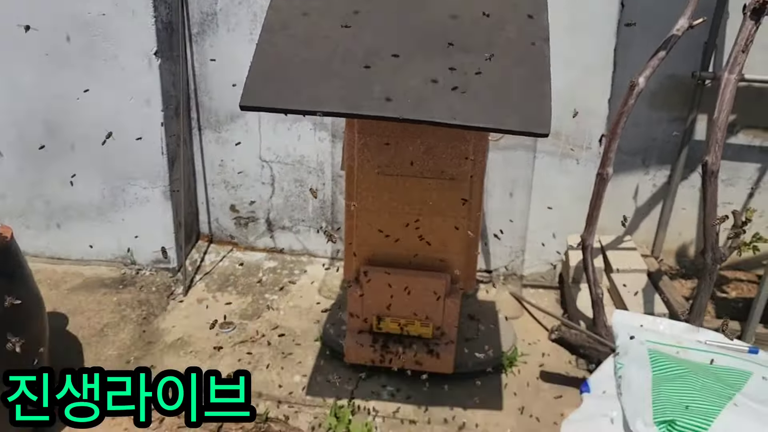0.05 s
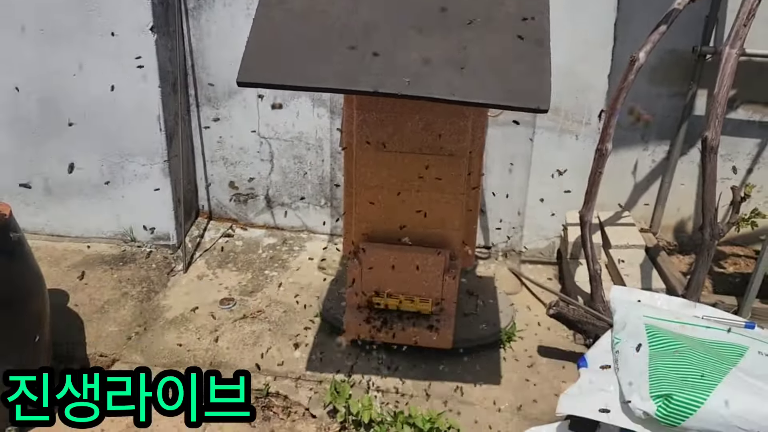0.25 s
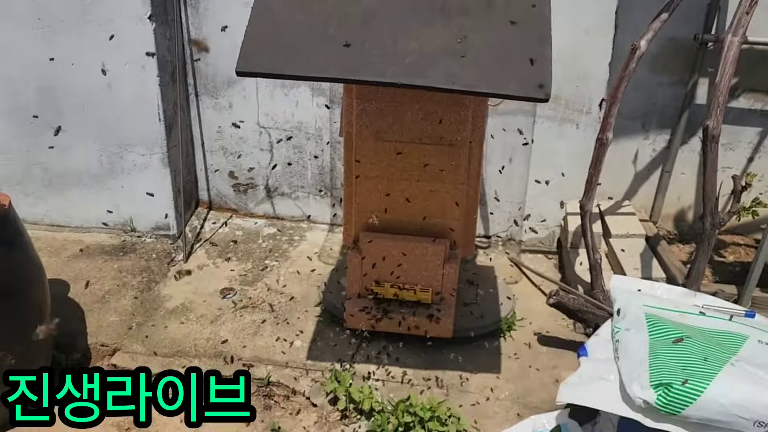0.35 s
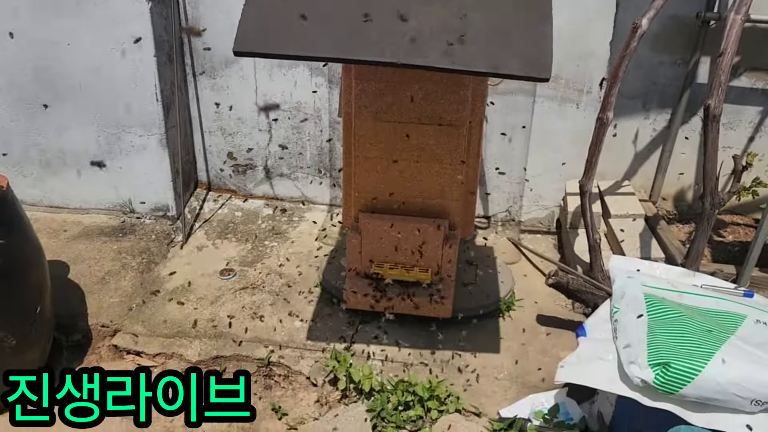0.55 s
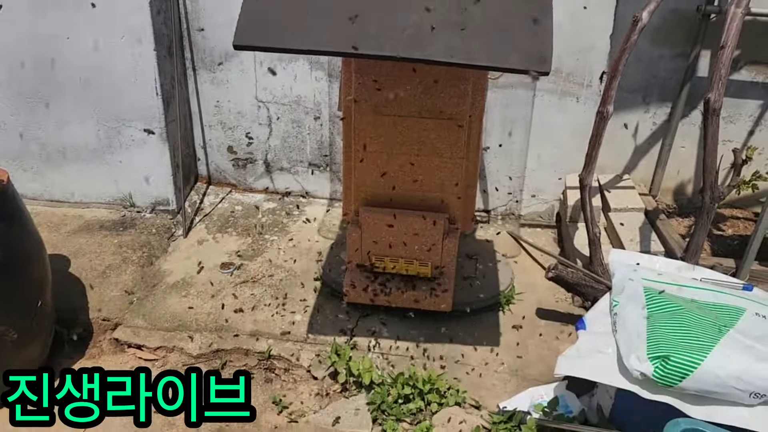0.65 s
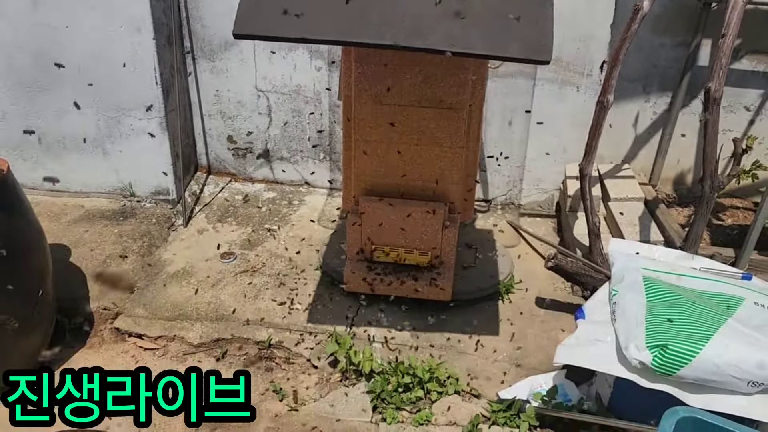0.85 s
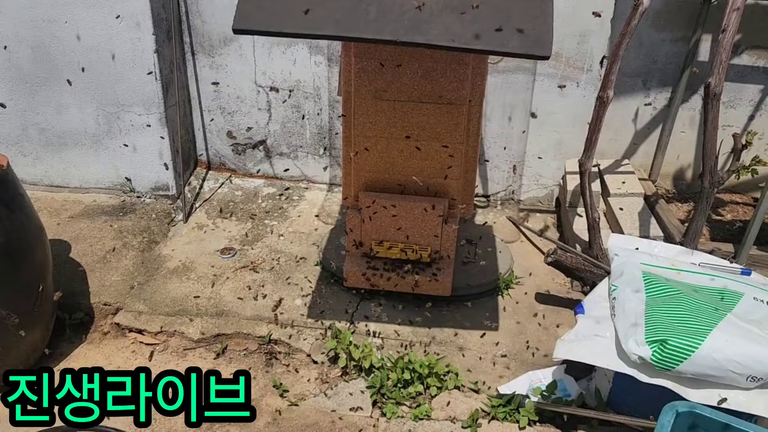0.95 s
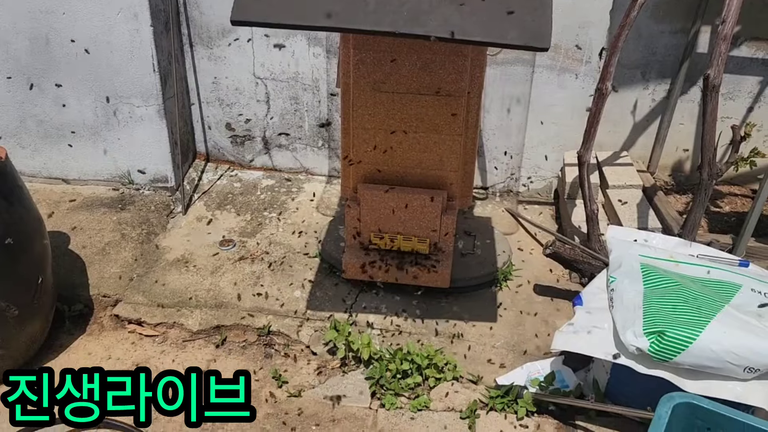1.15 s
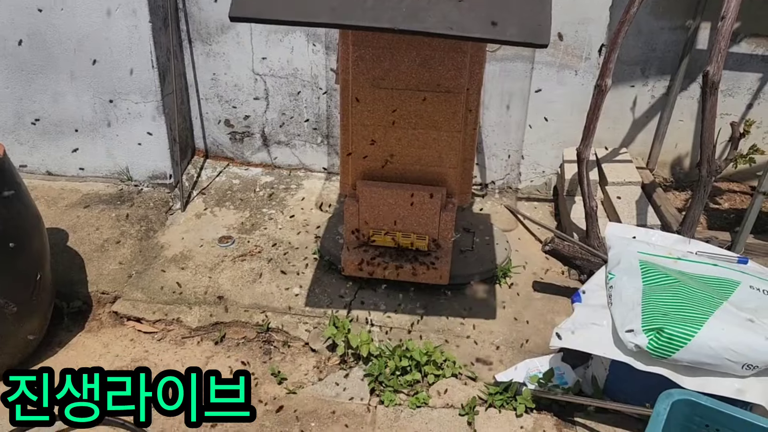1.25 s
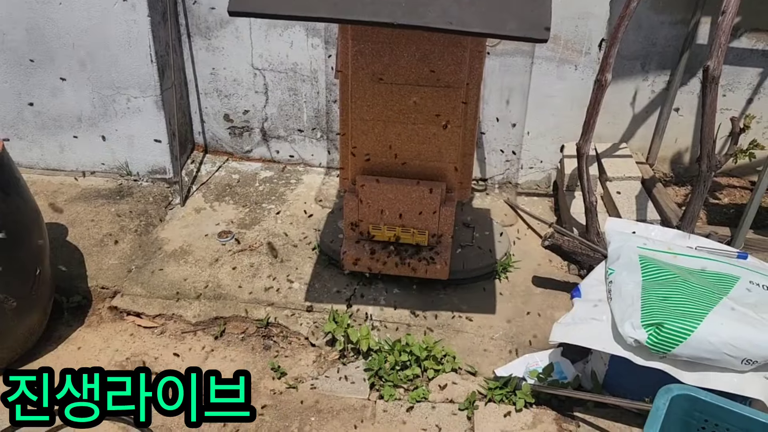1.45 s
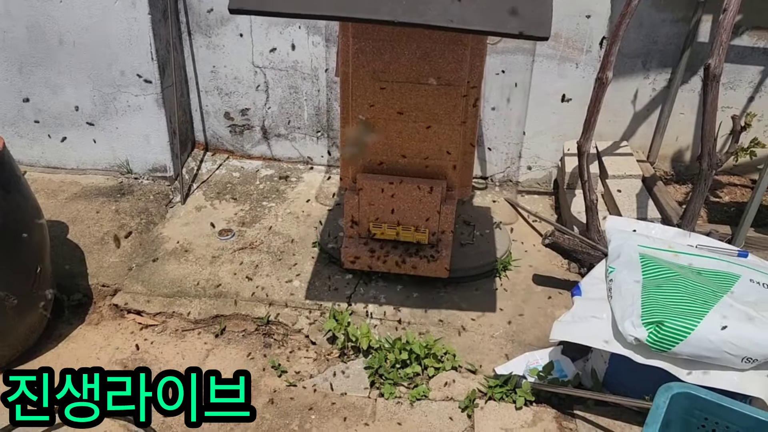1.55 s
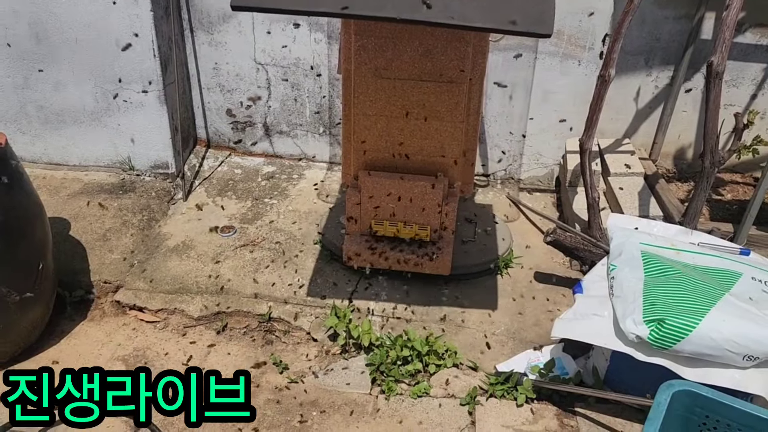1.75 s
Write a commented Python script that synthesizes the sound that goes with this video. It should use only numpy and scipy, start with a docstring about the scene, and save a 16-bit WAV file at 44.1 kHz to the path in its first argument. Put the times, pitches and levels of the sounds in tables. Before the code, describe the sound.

A swarm of honeybees buzzes steadily around a wooden hive in a small walled yard, single bees darting close. Near the start, one sharp knock snaps by the microphone with a soft thump, then a light breeze rumbles over steady hiss.

```python
"""A small walled yard, where honeybees circle a wooden hive. Each bee buzzes on its own wandering
wingbeat, the walls add a short echo, and a few bees dart close, swelling and bending in pitch.
One sharp knock snaps and rings right by the microphone, followed by a soft low thump.
A light breeze rumbles and bumps on the microphone over a bed of steady hiss."""
import sys
import numpy as np
from scipy import signal
from scipy.fft import rfft, irfft
from scipy.io import wavfile
from scipy.ndimage import map_coordinates

SR = 44100
rng = np.random.default_rng(int(sys.argv[2]) if len(sys.argv) > 2 else 0)


def put_to_file(sound):
    """Save the sound as 16-bit audio at rate SR, in the file named by the first command-line argument."""
    columns = np.atleast_2d(sound).T  # one column per channel
    safe = np.clip(columns, -1, 1)
    whole_steps = np.round(safe * 32767)
    wavfile.write(sys.argv[1], SR, whole_steps.astype(np.int16))


N = 79380

# Pitch spread of the swarm. Each row: share of bees that beat slower (0-1), wingbeat in Hz.
WINGBEAT_SPREAD = [(0, 197.7), (.12, 221), (.35, 246.1), (.65, 264), (.9, 279.2), (1, 293.5)]
# Tone colour of one bee. Each row: frequency in Hz, relative harmonic level in dB.
BUZZ_TONE = [(200, 1.5), (270, -3), (420, 0), (530, 0.5), (760, -8), (1050, -9), (1400, -5), (1750, -11),
             (2200, -14), (3000, -18), (5000, -25.5), (8000, -26.5)]
# Close fly-bys. Each row: closest moment in seconds, wingbeat in Hz, glide at that moment in Hz per
# second, level in dB, boost or cut of the fundamental in dB.
FLY_BYS = [(.31, 260.3, -20, -43, -7), (.44, 269.6, -40, -52, -5), (0.699, 283, -39.5, -47.5, -1),
           (.77, 238, -110, -47, -12), (0.841, 262.6, -90.5, -48.5, 9), (.98, 243, -69, -46, 0),
           (1.14, 278.5, 39.5, -48.5, -1), (1.40, 269.4, 30.5, -51.5, 11), (1.59, 271.4, -61, -48.5, -12),
           (1.75, 254.7, 61, -61, 13)]
# Ring of the knock. Each row: pitch in Hz, left and right relative levels in dB, t60 in seconds.
RING_MODES = [(1272, -0.5, -14, 0.049), (1457, -11.5, -9, 0.056), (2210, -7, -22, 0.022),
              (2360, 5, -4.5, 0.019), (3540, -17, 1, .02), (3720, -12, -1.5, 0.026), (4170, -11, -1, 0.021),
              (5557, -4.5, -2.5, 0.043), (6200, -1.5, -7, 0.033), (7640, -1.5, -10, 0.071),
              (7840, -13, -2.5, 0.074), (7860, 2, -15, .045), (8224, -22, -3.5, .04),
              (10590, -24, -11, .025), (14100, -11, -19, .035)]
# Bright crack of the knock. Each row: frequency in Hz, relative level in dB.
CRACK_SPECTRUM = [(300, -35), (850, -28), (1250, -10), (2300, 2.5), (2850, -6), (3600, 2.5), (6000, 0),
                  (8000, 5.5), (9300, -8), (12000, -2.5), (15500, -16)]
# Duller tail of the knock. Each row: frequency in Hz, relative level in dB.
TAIL_SPECTRUM = [(300, -25), (850, -14), (1250, -3), (2300, -4.5), (2850, -6), (3700, -2.5), (6000, -3),
                 (7900, -0.5), (9300, -11), (12000, -9), (15500, -16)]
# Low bumps on the microphone. Each row: start in seconds, pitch in Hz, level in dB, rise in seconds.
MIC_BUMPS = [(0.216, 63, -28.5, 0.0067), (1.009, 58.5, -35, 0.0056), (1.272, 88, -29, 0.0056),
             (1.337, 50.5, -40, 0.0093)]
# Swell of the breeze. Each row: time in seconds, level before panning in dB.
GUST_LEVELS = [(0, -53), (.4, -52.5), (.57, -55), (.64, -49), (.7, -54), (.95, -52.5), (1.02, -43),
               (1.07, -48), (1.255, -47.5), (1.32, -41), (1.37, -44), (1.46, -50), (1.535, -40),
               (1.58, -49.5), (1.75, -50.5), (1.8, -50)]
# Wind rumble on the microphone. Each row: frequency in Hz, relative level in dB.
RUMBLE_SPECTRUM = [(15, -29), (30, -5), (55, 2.5), (85, -2.5), (125, -9), (180, -8.5), (400, -44.5)]
# Colour of the hiss bed. Each row: frequency in Hz, relative level in dB.
HISS_SPECTRUM = [(100, -4.5), (350, 7.5), (1000, 1.5), (2000, 2), (2800, -3.5), (4700, -3.5), (6800, -3),
                 (7600, 2), (8250, -1.5), (8900, -12), (11000, -12.5), (12500, -8), (16000, -10)]

BEE_COUNT, SWARM_DB = 90, -41.5
WANDER, WANDER_PER_S = .024, 7  # pitch drift as a bee steers, as a share of its wingbeat
FLUTTER, FLUTTER_PER_S = .004983, 35  # quick unevenness of the wingbeat, also a share
DISTANCE_DB, SWOOP_DB, SWOOP_PER_S = 1.5, 3, 6.04  # near and far bees; coming and going
SIDE_LAG_S, PAN_DB = .00019, 3  # between the channels, for a bee far to one side
YARD_T60_S, YARD_DB = .23, -9.5
PASS_S = .035  # time for a fly-by to fall by 6 dB
KNOCK_S, KNOCK_RISE_S, KNOCK_LAG_S, RING_DB = .2067, .00038, .00005, -15
SNAP_DB, SNAP_T60_S = -5, .007  # first instant of the contact
CRACK_DB, CRACK_T60_S = -15, .024
TAIL_DB, TAIL_T60_S = -22, .1
BREEZE_PAN_DB, BREEZE_SIDE_DB = -3, -10
HISS_DB, TOP_HZ = -47, 16000


def bee(t, wing_hz, bend_hz, fundamental_db=0, size=1024, harmonics=30):
    """One buzz: a wing stroke looped at a fluttering rate, drifting from side to side in flight."""
    slow = np.linspace(0, t[-1], size)
    k = np.arange(harmonics) + 1
    tone = gain_at(k * wing_hz, BUZZ_TONE)
    tone = tone / np.linalg.norm(tone) * undb(fundamental_db * (k == 1))
    partials = tone * np.exp(2j * np.pi * rng.random(harmonics))
    stroke = size / np.sqrt(2) * irfft(np.append(0, partials), size)
    flutter = np.interp(t, slow, FLUTTER * walk(slow, FLUTTER_PER_S))
    phase = np.cumsum(wing_hz * (1 + flutter) + bend_hz) / SR
    side = np.interp(t, slow, np.tanh(walk(slow, 1)))
    channels = []
    for toward in (side / 2, -side / 2):  # the nearer channel is earlier and louder
        place = (phase + toward * SIDE_LAG_S * wing_hz) % 1 * size
        buzz = np.interp(place, np.arange(size + 1), np.append(stroke, stroke[0]))
        channels.append(buzz * undb(toward * PAN_DB))
    return np.array(channels)


def swarm(t):
    """A cloud of bees, each wandering in pitch and distance, with a short echo off the yard walls."""
    shares, hz = np.array(WINGBEAT_SPREAD).T
    slow = np.linspace(0, t[-1], 512)
    direct = 0
    for wing_hz in np.interp(np.linspace(0, 1, BEE_COUNT), shares, hz):
        steer_hz = np.interp(t, slow, wing_hz * WANDER * walk(slow, WANDER_PER_S))
        near_db = DISTANCE_DB * (2 * rng.random() - 1) + SWOOP_DB * walk(slow, SWOOP_PER_S)
        direct = direct + np.interp(t, slow, undb(near_db)) * bee(t, wing_hz, steer_hz)
    walls = rng.standard_normal((2, N)) * fade(t, YARD_T60_S)
    echo = unit(irfft(rfft(direct) * rfft(walls), N))
    return undb(SWARM_DB) * unit(unit(direct) + undb(YARD_DB) * echo)


def passing_bees(t):
    """Single bees swell out of the swarm and bend in pitch as they dart by."""
    out = 0
    for when, wing_hz, glide, db, fundamental_db in FLY_BYS:
        along = (t - when) / PASS_S
        swell = undb(db) / (1 + along ** 2)
        bend_hz = glide * 2 * PASS_S * np.tanh(along / 2)
        out = out + swell * bee(t, wing_hz, bend_hz, fundamental_db)
    return out


def knock(t):
    """A hard contact in four layers: snap, crack, brief ring and diffuse tail, a hair later on the right."""
    age = t - KNOCK_S - np.array([[0], [KNOCK_LAG_S]])
    ring = 0
    for hz, left_db, right_db, t60 in RING_MODES:
        ring = ring + undb([[left_db], [right_db]]) * np.sin(2 * np.pi * hz * age) * fade(age, t60)
    contact = noise(CRACK_SPECTRUM)[0]  # one noise for both channels keeps the snap focused
    snap = undb(SNAP_DB) * np.interp(age, t, contact) * fade(age, SNAP_T60_S)
    crack = undb(CRACK_DB) * noise(CRACK_SPECTRUM) * fade(age, CRACK_T60_S)
    tail = undb(TAIL_DB) * noise(TAIL_SPECTRUM) * fade(age, TAIL_T60_S)
    attack = np.clip(age / KNOCK_RISE_S, 0, 1)
    return attack * (undb(RING_DB) * ring + snap + crack + tail)


def thumps(t):
    """Soft bumps on the microphone, each a few low swings that die away fast."""
    out = 0
    for start, hz, db, rise in MIC_BUMPS:
        age = np.maximum(t - start, 0)
        envelope = age / rise * np.exp(1 - age / rise)
        out = out + undb(db) * envelope * np.cos(2 * np.pi * hz * age)
    return out


def breeze(t):
    """Small gusts rumble on the microphone, leaning to the right."""
    mid, side = noise(RUMBLE_SPECTRUM)
    sign = np.array([[1], [-1]])
    rumble = mid + sign * undb(BREEZE_SIDE_DB) * side
    gusts = undb(np.interp(t, *np.array(GUST_LEVELS).T))
    return gusts * rumble * undb(sign * BREEZE_PAN_DB / 2)


def hiss():
    """A wide, steady bed of hiss."""
    return undb(HISS_DB) * noise(HISS_SPECTRUM)


def undb(db):
    """Decibels to gain."""
    return 10 ** (np.asarray(db) / 20)


def unit(x):
    """Scale to rms 1."""
    return x / np.sqrt(np.mean(x ** 2))


def gain_at(hz, points):
    """Gain of an EQ curve of (Hz, dB) points on a log-frequency axis."""
    f, db = np.array(points).T
    return undb(np.interp(np.log(np.maximum(hz, 1)), np.log(f), db))


def noise(points):
    """Two unrelated noises coloured by an EQ curve."""
    white = rfft(rng.standard_normal((2, N)))
    return unit(irfft(white * gain_at(np.fft.rfftfreq(N, 1 / SR), points), N))


def walk(t, rate):
    """Smooth random motion with spread near 1 and about rate turns a second."""
    knots = rng.standard_normal(size=256)
    return map_coordinates(knots, [t * rate + rng.random()], mode="mirror")


def fade(age, t60):
    """Silent before age 0, then falling 60 dB every t60 seconds."""
    return (age >= 0) * np.exp(-np.log(1000) * np.maximum(age, 0) / t60)


def scene():
    """The mix: bees and one knock over bumps, breeze and hiss."""
    t = np.arange(N) / SR
    return swarm(t) + passing_bees(t) + knock(t) + thumps(t) + breeze(t) + hiss()


def record(dry):
    """Hard-limit the loudest peak, then cut the top end steeply."""
    lowpass = signal.ellip(10, .1, 80, TOP_HZ, fs=SR, output="sos")
    return signal.sosfilt(lowpass, np.clip(dry, -.85, .85))


dry = scene()
out = record(dry)
put_to_file(out)
```